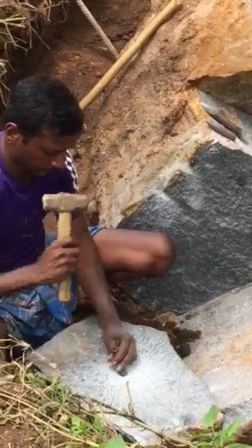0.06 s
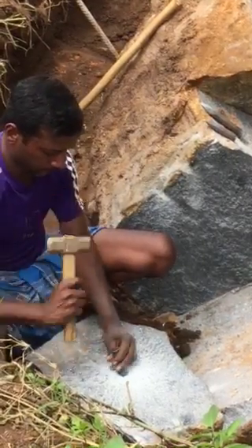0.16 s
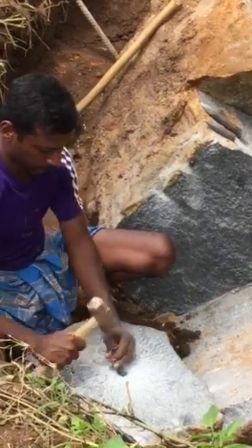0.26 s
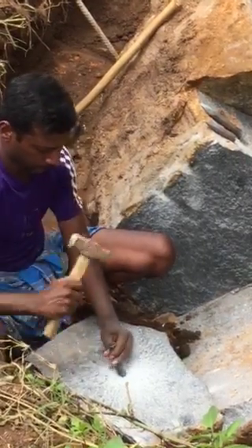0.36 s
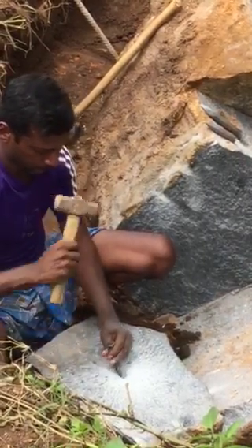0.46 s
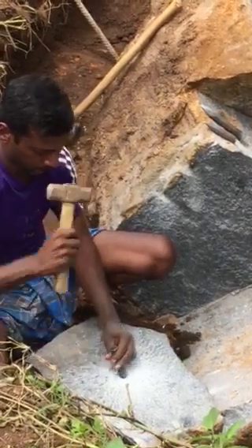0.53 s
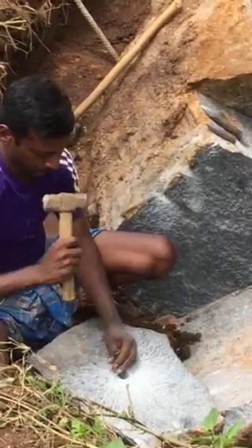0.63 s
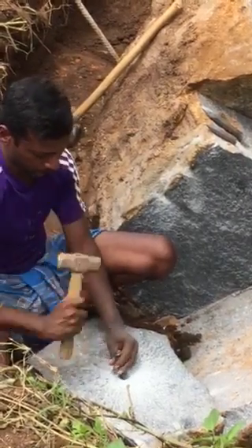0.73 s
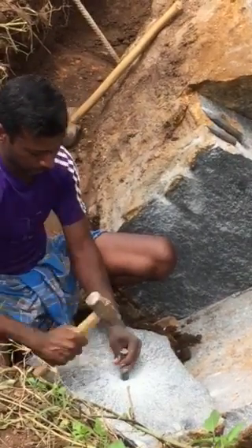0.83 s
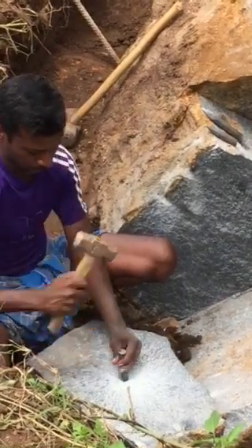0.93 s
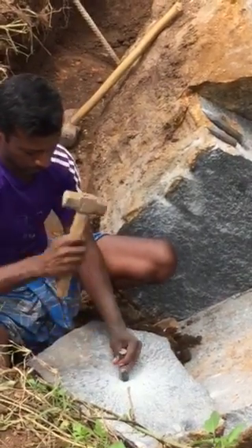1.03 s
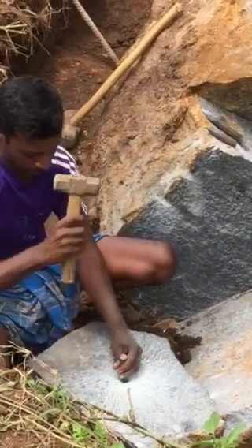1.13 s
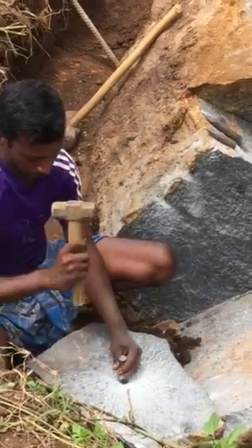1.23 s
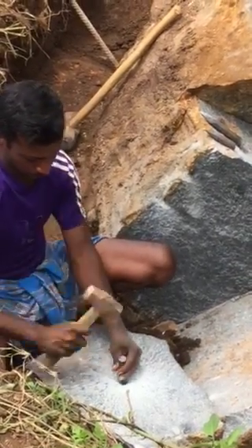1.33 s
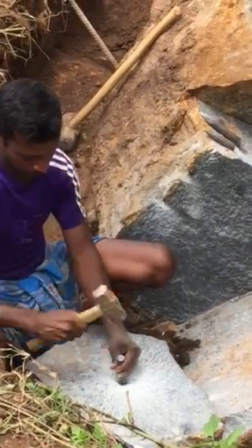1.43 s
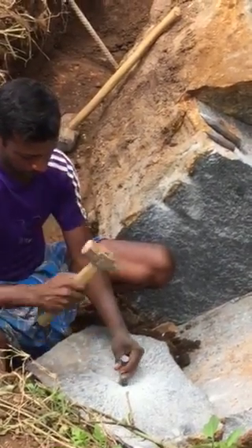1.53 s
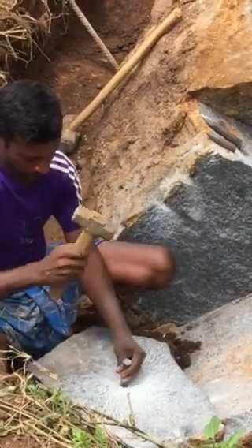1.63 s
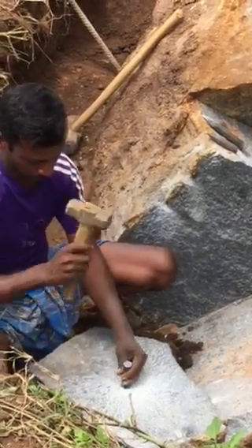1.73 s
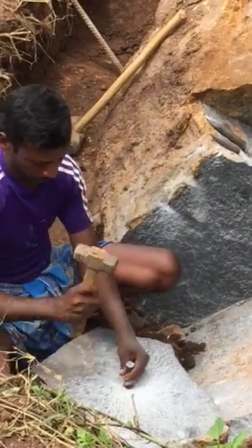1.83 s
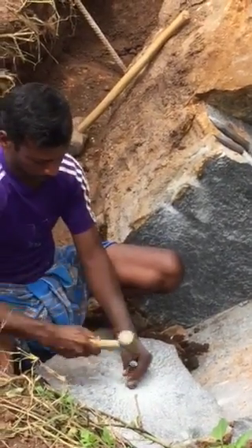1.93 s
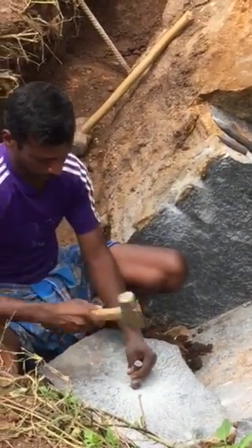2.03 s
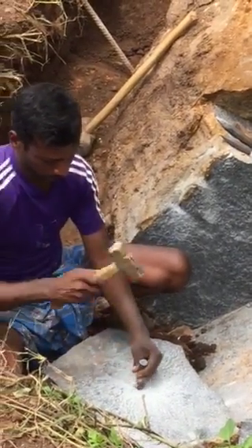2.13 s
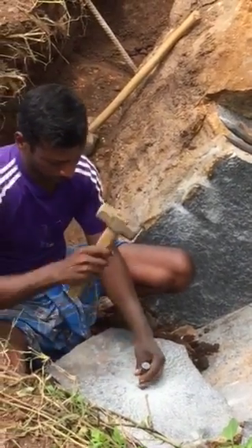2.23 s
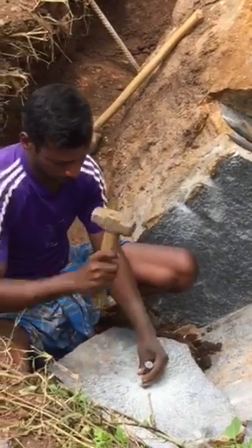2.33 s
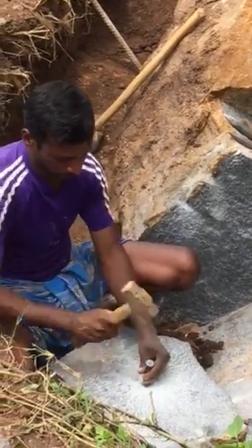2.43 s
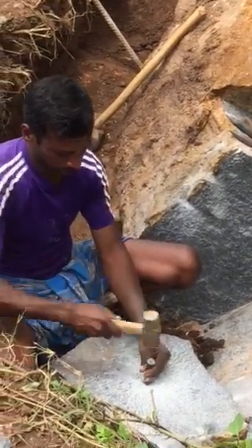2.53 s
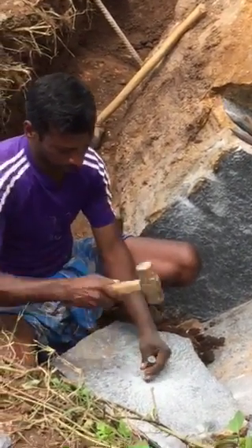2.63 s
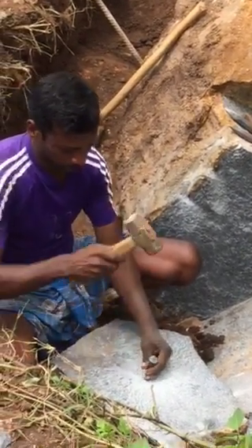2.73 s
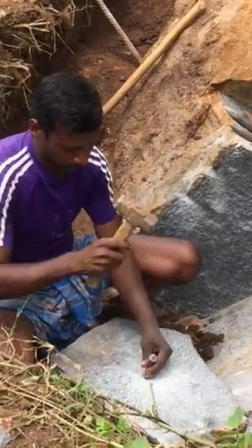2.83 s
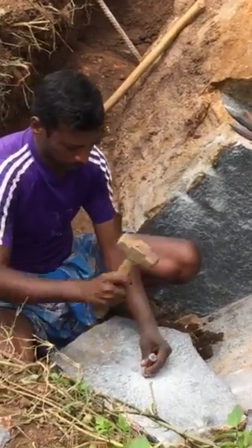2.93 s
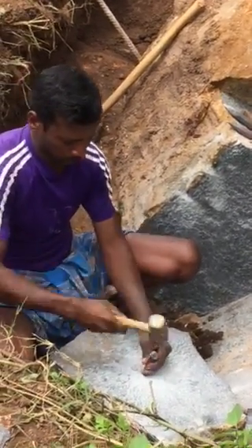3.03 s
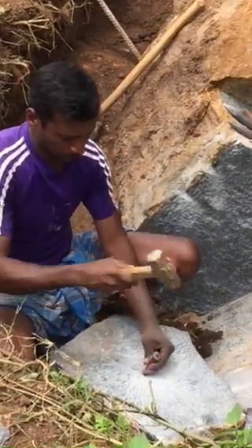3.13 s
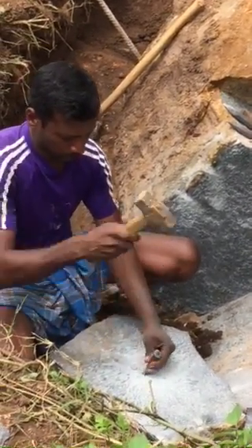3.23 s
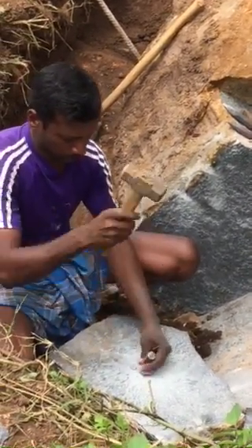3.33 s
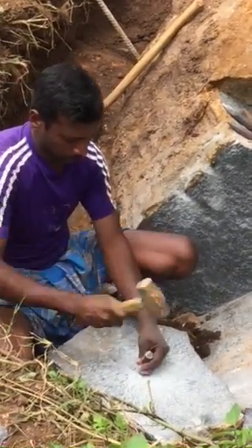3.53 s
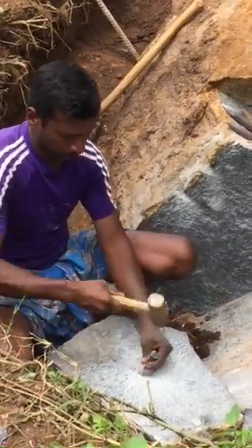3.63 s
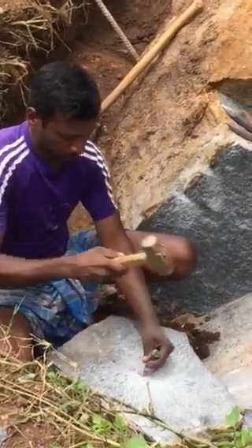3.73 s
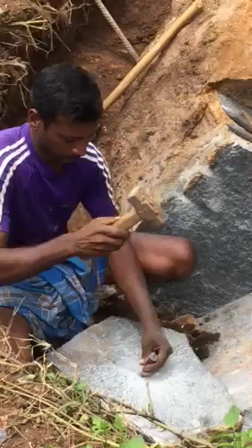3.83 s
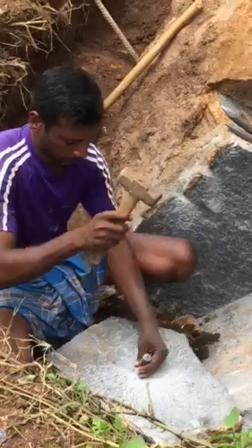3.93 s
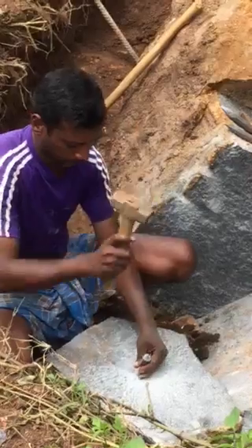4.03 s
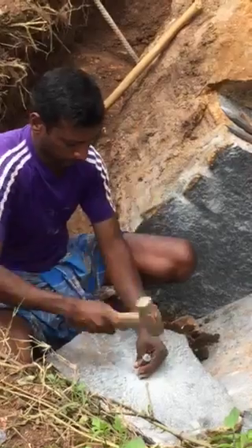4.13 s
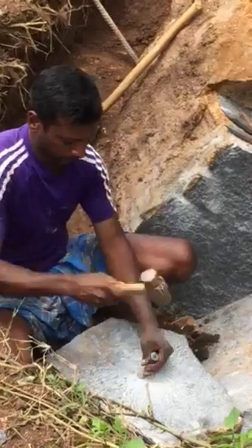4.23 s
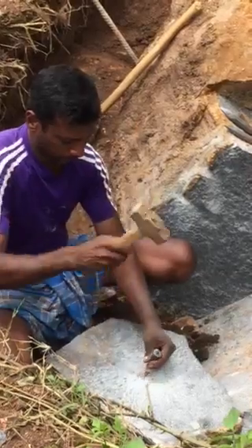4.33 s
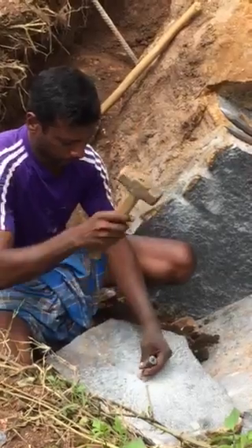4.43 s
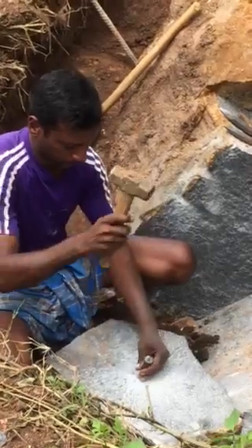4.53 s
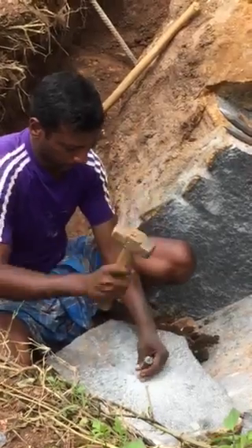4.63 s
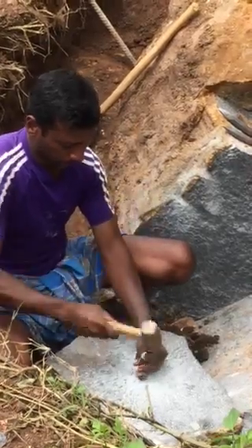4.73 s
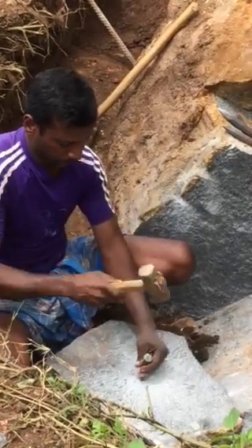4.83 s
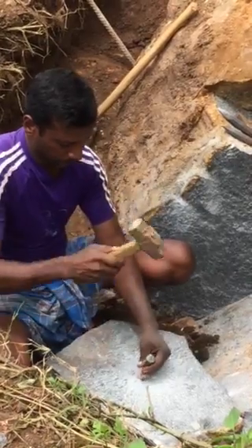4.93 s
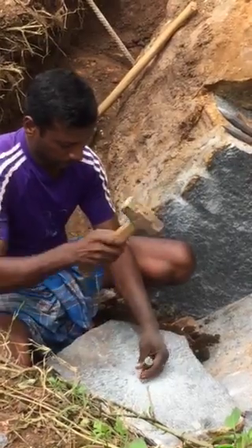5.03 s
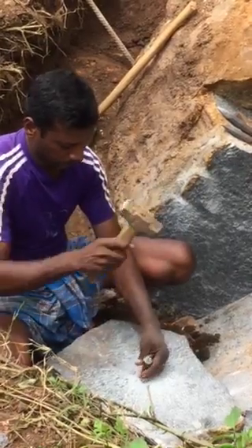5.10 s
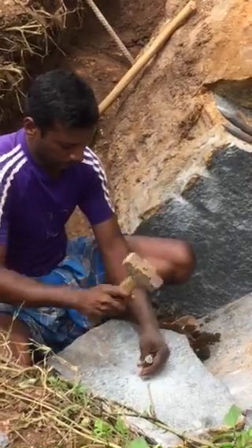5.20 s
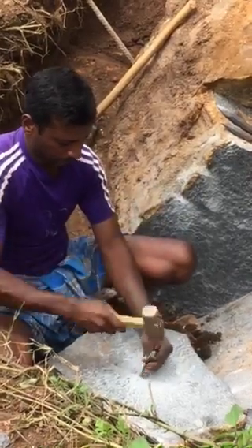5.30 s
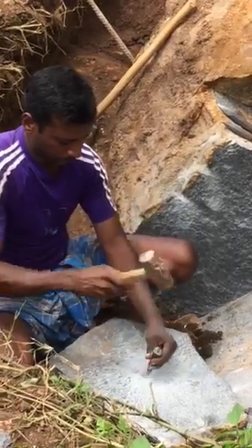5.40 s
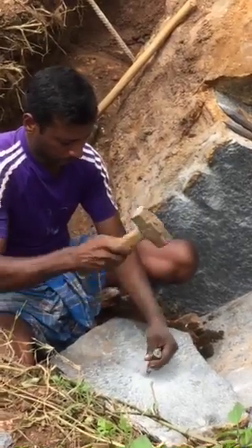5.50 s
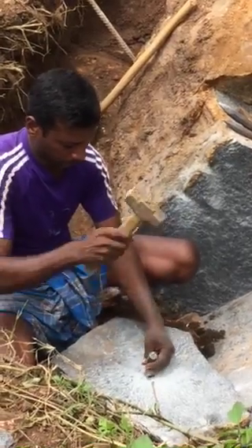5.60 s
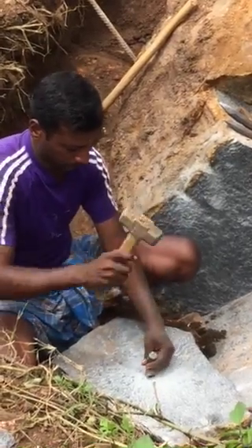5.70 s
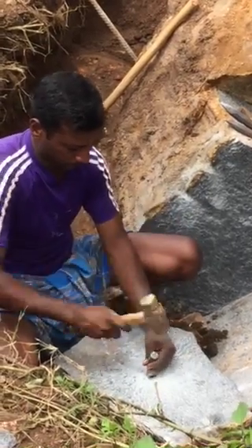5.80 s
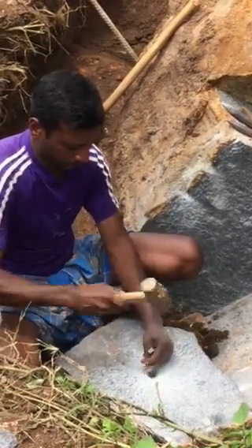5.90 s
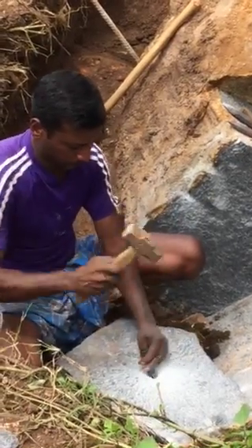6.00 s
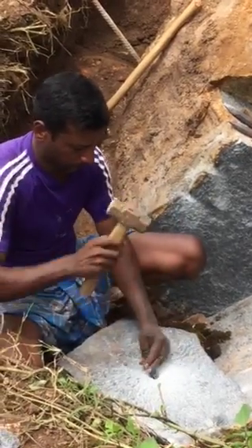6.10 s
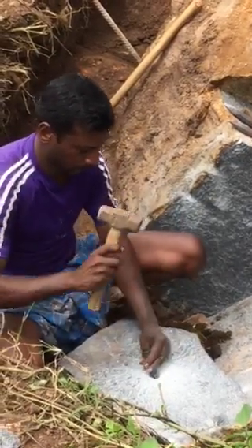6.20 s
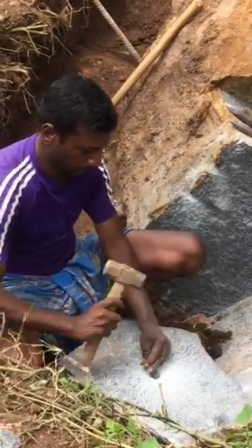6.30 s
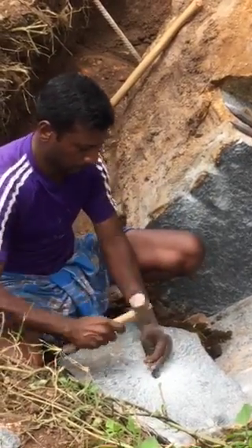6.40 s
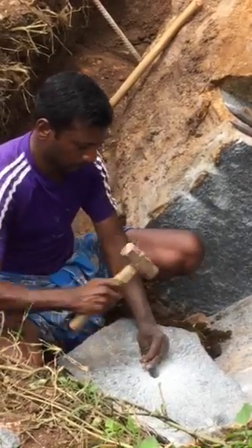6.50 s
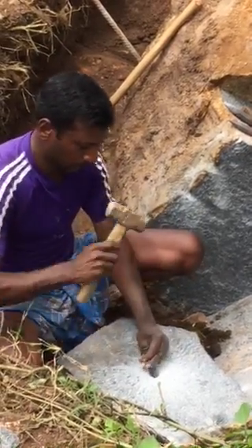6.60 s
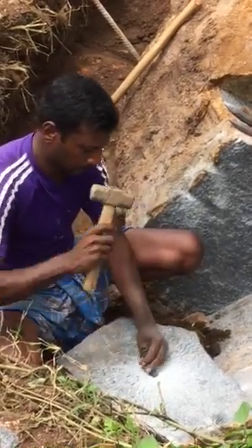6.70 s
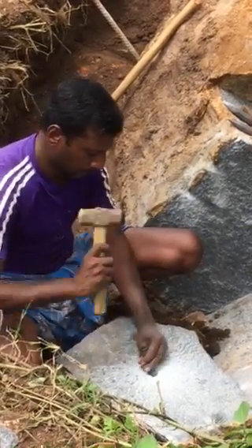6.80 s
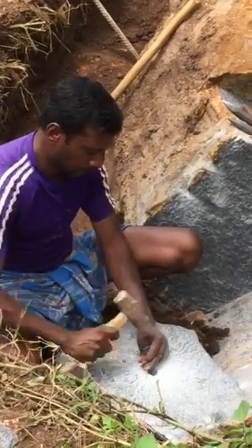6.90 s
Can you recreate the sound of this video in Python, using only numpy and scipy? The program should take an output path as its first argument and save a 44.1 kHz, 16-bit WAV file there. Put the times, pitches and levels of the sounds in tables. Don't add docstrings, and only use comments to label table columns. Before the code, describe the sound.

A hand hammer strikes a steel chisel on a stone slab, sharp gritty clinks about two a second, outdoors with insects.

```python
import sys
import numpy as np
from scipy import signal
from scipy.fft import rfft, irfft
from scipy.io import wavfile
from scipy.ndimage import uniform_filter1d

SR = 44100
rng = np.random.default_rng(int(sys.argv[2]) if len(sys.argv) > 2 else 0)


def wav_out(sig):
    wavfile.write(sys.argv[1], SR, np.round(np.clip(np.atleast_2d(sig).T, -1, 1) * 32767).astype(np.int16))


def natural_amplitude(level_db):
    exponent = np.asarray(level_db, float) / 20
    return 10 ** exponent


N = 306495


def rms_one(x):
    return x / np.sqrt(np.mean(x ** 2) + 1e-20)


def band(x, low_hz, high_hz, order=2):
    sos = signal.butter(order, [low_hz, min(high_hz, .45 * SR)], "band", fs=SR, output="sos")
    return signal.sosfilt(sos, x)


def noise_band(low_hz, high_hz, order=2):
    return band(rng.standard_normal(N), low_hz, high_hz, order)


def coloured(spectrum, size=N):
    hz, db = np.transpose(spectrum)
    grid_hz = np.maximum(np.fft.rfftfreq(size, 1 / SR), 1)
    gain = natural_amplitude(np.interp(np.log(grid_hz), np.log(hz), db))
    return rms_one(irfft(rfft(rng.standard_normal(size)) * gain, size))


def drift(rate_hz):
    knots = rng.standard_normal(int(N / SR * 100))
    r = np.exp(-2 * np.pi * rate_hz / 100)
    slow = rms_one(signal.lfilter([1], [1, -r], knots))
    return np.interp(np.arange(N) / SR * 100, np.arange(len(knots)), slow)


def ring(x, hz, t60_s):
    r, w = natural_amplitude(-60 / (t60_s * SR)), 2 * np.pi * hz / SR
    return signal.lfilter([0, np.sin(w)], [1, -2 * r * np.cos(w), r * r], x + 1e-18)


def resonances(peaks):
    white = rng.standard_normal(N)
    out = np.zeros(N)
    for hz, width_hz, db in peaks:
        tone = rms_one(band(white, hz - width_hz / 2, hz + width_hz / 2, order=3))
        out += natural_amplitude(db + 2.5 * drift(3)) * tone
    return out


def clicks(times_s, db):
    out = np.zeros(N)
    out[np.round(np.asarray(times_s) * SR).astype(int)] = natural_amplitude(db)
    return out


def dying(times_s, db, t60_s, hold_s=0):
    r = natural_amplitude(-60 / (t60_s * SR))
    start = clicks(times_s, db)
    release = np.roll(start, max(int(hold_s * SR), 1))
    return np.cumsum(start - release) + signal.lfilter([1], [1, -r], release + 1e-18)


def struck(modes, times_s, db, rattle_s):
    drive = rng.standard_normal(N) * dying(times_s, db, rattle_s) / np.sqrt(rattle_s * SR / 14)
    return sum(natural_amplitude(level_db) * ring(drive, hz, t60_s) for hz, level_db, t60_s in modes)


# (time [s], level [dB])
GUSTS = [(0.0, -69.5), (0.21, -60), (3.44, -64.5), (3.58, -55), (3.85, -77), (4.06, -65), (4.26, -58),
         (4.47, -74.5), (4.72, -70.5), (4.9, -64.5), (5.46, -65.5), (6.02, -60), (6.46, -67.5), (6.95, -56)]
# (frequency [Hz], density [dB per Hz])
WIND_SPECTRUM = [(12, -73), (25, -20), (40, -3), (60, 4.5), (90, 2.5), (140, -6.5), (220, -17), (400, -40),
                 (1000, -86)]


def wind():
    gust_db = np.interp(np.arange(N) / SR, *np.transpose(GUSTS))
    return natural_amplitude(gust_db + 3.5 + 2.3 * drift(6)) * coloured(WIND_SPECTRUM)


# (frequency [Hz], density [dB per Hz])
HUM_SPECTRUM = [(150, -0.5), (300, -1), (600, -3.5), (1200, -0.5), (2200, -5.5), (3500, -10), (5500, -16),
                (8000, -21), (11000, -26.5), (13500, -20.5), (16000, -18.5)]
# (centre [Hz], width [Hz], level [dB])
HUM_PEAKS = [(590, 150, -18.5), (1230, 200, -21), (1970, 130, -16)]


def countryside_hum():
    level = natural_amplitude(-61.5 + 0.37 * drift(2.8))
    return level * (coloured(HUM_SPECTRUM) + natural_amplitude(drift(3.8)) * resonances(HUM_PEAKS))


# (centre [Hz], width [Hz], level [dB])
CHORUS = [(6300, 260, 0), (6470, 200, -3), (6160, 160, -6), (11800, 500, -15)]
# (centre [Hz], width [Hz], level [dB])
CALLER = [(6070, 70, 0), (5810, 120, -10), (5950, 200, -11)]


def insects():
    t = np.arange(N) / SR
    period_s, swell_peak_s = 1.139, 0.6
    chorus_db = -66.5 + 1.5 * np.cos(2 * np.pi * (t - swell_peak_s) / period_s)
    buzz = 1 + 0.2 * np.sin(2 * np.pi * 98 * t + 1.1 * drift(3))
    calls = dying(.5 + period_s * np.arange(6), -68.5, .4, hold_s=.42)
    chorus = natural_amplitude(chorus_db + 0.97 * drift(7.8)) * rms_one(resonances(CHORUS))
    return buzz * (chorus + calls * rms_one(resonances(CALLER)))


# (time [s], length [s], start [Hz], end [Hz], level [dB])
BIRDS = [(0.1, 0.03, 1207, 1250, -59), (0.21, 0.046, 1295, 1240, -64.5), (0.892, 0.032, 1280, 1290, -61),
         (2.2, 0.04, 1190, 1220, -65), (2.284, 0.1, 1250, 1430, -62), (2.424, 0.17, 590, 590, -66.5),
         (5.815, 0.028, 1240, 1198, -63), (0.763, 0.082, 1233, 1246, -61.5), (1.255, 0.1, 2016, 1983, -56),
         (1.27, 0.046, 1810, 1780, -61), (1.34, 0.044, 2130, 2180, -59), (1.456, 0.044, 1257, 1280, -56.5),
         (2.859, 0.055, 1340, 1230, -55.5), (2.982, 0.048, 1280, 1230, -60),
         (3.562, 0.084, 1184, 1333, -59.5), (3.564, 0.025, 1710, 1930, -59),
         (4.407, 0.026, 1970, 1960, -63), (4.456, 0.023, 3020, 2830, -59),
         (4.618, 0.061, 2980, 2800, -55.5), (4.687, .035, 4000, 3500, -67),
         (4.727, 0.034, 2550, 2350, -60.5), (4.745, 0.045, 2010, 2020, -59),
         (5.178, 0.031, 1272, 1296, -60)]


def birds():
    out = np.zeros(N)
    flutter = 1 + .45 * rms_one(noise_band(20, 140))
    for s, length_s, start_hz, end_hz, db in BIRDS:
        n, at = int(length_s * SR), int(s * SR)
        phase = 2 * np.pi * np.cumsum(np.linspace(start_hz, end_hz, n)) / SR
        out[at:at + n] += natural_amplitude(db) * np.hanning(n) ** .35 * np.sin(phase)
    return out * flutter


# (time [s], level [dB], low [Hz], high [Hz], t60 [s])
KNOCKS = [
    (3.492, -42, 130, 330, .12),
    (3.49, -50, 500, 1100, .15),
    (3.5, -47, 50, 120, .2),
    (3.547, -47, 500, 1000, .25),
    (4.92, -59, 1800, 2020, .7),
    (4.955, -53, 480, 800, .8),
    (5.03, -57, 500, 1300, .15),
    (6.19, -45, 40, 90, .25),
]


def far_knocks():
    out = np.zeros(N)
    for s, db, low_hz, high_hz, t60_s in KNOCKS:
        envelope = uniform_filter1d(dying([s], db, t60_s, hold_s=0.012), size=350)
        out += rms_one(noise_band(low_hz, high_hz)) * envelope
    return out


# (time [s], level [dB], centre [Hz])
TAPS = [(0.132, -65, 3000), (.48, -45, 2100), (2.891, -72, 7500), (0.68, -54, 2500), (4.02, -58, 2500),
        (4.571, -74, 6000), (4.585, -43, 1960), (5.1191, -38, 2630), (5.675, -47, 2500), (5.69, -49, 2500),
        (5.701, -40, 2700), (5.7049, -42, 2680)]


def taps():
    out = np.zeros(N)
    for s, db, hz in TAPS:
        envelope = dying([s], db + 10, 0.013) + dying([s], db - 2, 0.091)
        out += band(rng.standard_normal(N) * envelope, hz / 2, hz * 1.48, order=3)
    return out


# (time [s], length [s], lower ring [dB], upper ring [dB])
SCRAPES = [(0.001, 0.066, -65, -88), (0.077, 0.035, -72, -75), (0.119, 0.02, -55.5, -64),
           (0.134, 0.012, -56, -62), (0.676, 0.031, -60, -66), (0.707, .02, -64, -65),
           (1.149, 0.029, -64.5, -73.5), (1.228, 0.034, -82, -84), (1.732, 0.048, -74.5, -72),
           (2.224, 0.063, -64, -87.5), (2.293, 0.015, -75, -77), (2.336, 0.016, -84, -73),
           (3.42, 0.037, -80, -69), (3.893, 0.054, -90, -75.5), (4.006, 0.0075, -54, -66),
           (4.024, 0.01, -79, -65), (4.569, 0.0033, -47, -47), (4.574, 0.016, -65, -54),
           (4.656, 0.024, -78, -81.5), (5.053, 0.049, -67, -81), (5.105, 0.011, -67, -50),
           (5.111, 0.013, -51, -61), (5.668, 0.018, -64, -59), (5.69, 0.018, -64, -52),
           (5.814, 0.013, -80, -73), (6.658, 0.027, -65, -79), (6.74, 0.03, -70, -68)]


def scrapes():
    out = np.zeros(N)
    for column, (hz, _, _) in zip((2, 3), CHISEL):
        drag = np.zeros(N)
        for row in SCRAPES:
            steadiness = np.sqrt(min(row[1], .006) * SR / 4)
            drag += dying([row[0]], row[column], 0.0035, hold_s=row[1]) / steadiness
        friction = drag * rng.standard_normal(N) * natural_amplitude(1.1 * drift(40))
        out += band(ring(friction, hz, 0.041), 9600, 13500)
    return out


# (time after the blow [s], level [dB])
ECHO_SHAPE = [(0, -80), (0.01, -50.5), (0.028, -48.5), (.045, -56.5), (.075, -55), (.13, -65), (.2, -80),
              (.3, -77.5), (.4, -110)]
ECHO_BANDS_DB = [-18, -9, -11.5, -9.5, -8, -6, -3, -2, -6.5, -7.5]


def banks(ringing):
    lag_s, db = np.transpose(ECHO_SHAPE)
    size = int(.4 * SR)
    shape = natural_amplitude(np.interp(np.arange(size) / SR, lag_s, db))
    out = natural_amplitude(-14.5) * signal.fftconvolve(ringing, shape * rng.standard_normal(size))[:N]
    for (low_hz, high_hz, _), level_db, echo_db in zip(CRACK_BANDS, band_levels(), ECHO_BANDS_DB):
        strength = clicks(TIMES_S, echo_db + 1.1 * (level_db - np.mean(level_db)))
        out += signal.fftconvolve(strength, shape)[:N] * rms_one(noise_band(low_hz, high_hz))
    return out


TIMES_S = [.4079, .9565, 1.5219, 2.0727, 2.6272, 3.1728, 3.7227, 4.2958, 4.858, 5.4064, 5.965, 6.4956]
# (ground thump [dB], weight on slab [dB], crushed grit [dB], snap of face [dB])
STONE = [(-29, -14.5, -22, 3), (-36.5, -14, -20, 1), (-34.5, -15, -14, -1.5), (-42.5, -20.5, -16, -8),
         (-50, -25.5, -14.5, -7), (-35, -14, -20.5, 1.5), (-19, -18.5, -16.5, 1), (-9.5, -13.5, -18, 2),
         (-10.5, -13.5, -18, 1), (-31.5, -17, -16, 1), (-9.5, -16, -21, 1), (-38.5, -14.5, -16, 0)]


def thump():
    push = clicks(np.array(TIMES_S) + 0.0019, np.transpose(STONE)[0] + 6)
    return natural_amplitude(7.5) * ring(push, 130, 0.0091) - ring(np.roll(push, 60), 56, 0.057)


MEAN_WEIGHT_DB, MEAN_GRIT_DB = -17, -18
# (frequency [Hz], level [dB], t60 [s])
SLAB = [(1950, 0, .02), (1860, -5, .015)]
# (frequency [Hz], level [dB], t60 [s])
CHIP_RING = [(4450, 0, .004), (4150, -3, .004), (8800, -6, .003)]


def slab():
    thump_db, _, grit_db, _ = np.transpose(STONE)
    hum = struck(SLAB, TIMES_S, -30 + 0.44 * thump_db, 0.57)
    chips = struck(CHIP_RING, TIMES_S, -30 + 1.3 * (grit_db - MEAN_GRIT_DB), .3)
    tok = struck([(642.5, 0.0087, 0.065)], TIMES_S, -27.5, .04)
    return hum + chips + tok


# (chisel ring [dB], looseness of grip [dB], hammer head ring [dB], top ring [dB])
STEEL = [(-17.5, -3.5, -13.5, -16.5), (-13, -4.5, -13.5, -12), (-30, 3, -19, -20), (-28, -0.5, -18, -13.5),
         (-26, 0, -12, -12), (-11, -7, -21, -19.5), (-15, 3.5, -16.5, -8.5), (-13, -10.5, -19, -18.5),
         (-13.5, -0.5, -19.5, -17), (-16.5, -3.5, -22.5, -11.5), (-15.5, -5, -25.5, -22.5),
         (-20, -0.5, -14.5, -24.5)]
# (frequency [Hz], level [dB], t60 [s])
CHISEL = [(10410, 0, .045), (10855, -1, .028), (11125, -7, .035)]
HEAD = [(11765, 0, .025), (12300, -8, .02), (9280, -10, .02)]
TOP = [(14700, 0, .016), (13450, -11, .012), (15200, -7, .008)]
# (frequency [Hz], level [dB], t60 [s])
FREE_RING = [(10450, -26.5, 0.32), (10850, -38.5, .3)]


def steel():
    ring_db, loose_db, head_db, top_db = np.transpose(STEEL)
    tilt_db = 0.39 * loose_db
    lower = struck(CHISEL[:1], TIMES_S, ring_db - 0.64 + tilt_db, 0.021)
    upper = struck(CHISEL[1:], TIMES_S, ring_db + 4.5 - tilt_db, 0.066)
    free = sum(ring(clicks(TIMES_S, ring_db + loose_db + db), hz, t60_s) for hz, db, t60_s in FREE_RING)
    head = struck(HEAD, TIMES_S, head_db, 0.033)
    top = struck(TOP, TIMES_S, top_db + 0.5, 0.078)
    return lower + upper + free + head + top


def band_levels():
    thump_db, weight_db, grit_db, snap_db = np.transpose(STONE)
    _, _, head_db, top_db = np.transpose(STEEL)
    weight, grit = weight_db - MEAN_WEIGHT_DB, grit_db - MEAN_GRIT_DB
    knock_db = 20 * np.log10(natural_amplitude(-26.5 + .6 * weight) + natural_amplitude(thump_db - 12))
    face_db = -18.5 + snap_db
    edge_db = -22.5 + 0.5 * snap_db
    chips_db = -19.5 + 1.5 * grit
    fine_grit_db = -16.5 + 1.1 * grit
    dust_db = -18.5 + 0.76 * grit
    splinter_db = -14.5 + 0.76 * weight
    return [knock_db, weight_db, face_db, edge_db, chips_db, fine_grit_db, dust_db, splinter_db,
            head_db - 3, top_db - 3]


def evened(noise, burst):
    blow = np.searchsorted(np.array(TIMES_S[1:]) * SR - 1, np.arange(N))
    wanted = np.bincount(blow, burst ** 2)
    actual = np.bincount(blow, (noise * burst) ** 2)
    return noise * burst * np.sqrt(wanted / actual)[blow]


# (low [Hz], high [Hz], t60 [s])
CRACK_BANDS = [(171, 360, 0.057), (486, 1046, 0.032), (1250, 2200, 0.039), (1680, 2500, 0.036),
               (2500, 3500, 0.041), (3670, 4800, 0.054), (5050, 6800, .06), (6830, 10760, 0.056),
               (9500, 13000, 0.022), (13930, 15800, 0.066)]


def crack():
    out = np.zeros(N)
    for (low_hz, high_hz, t60_s), db in zip(CRACK_BANDS, band_levels()):
        chatter = natural_amplitude(2.9 * rms_one(noise_band(80, 240)))
        burst = dying(TIMES_S, db - 5.5, t60_s, hold_s=0.0012) + dying(TIMES_S, db, 0.02)
        out += evened(noise_band(low_hz, high_hz) * chatter, burst)
    return out


def scene():
    air = wind() + countryside_hum() + insects()
    ringing, cracking = steel(), crack()
    sink_db = 5.7 * dying(TIMES_S, 0, 0.54, hold_s=0.13)
    ducked = natural_amplitude(-signal.lfilter([.002], [1, -.998], sink_db))
    blows = cracking + thump() + ringing + slab() + banks(ringing + natural_amplitude(-6) * cracking)
    return (blows + taps() + scrapes() + far_knocks() + birds() + ducked * air)[None]


def roll_off(x):
    return signal.sosfilt(signal.butter(12, 16800, fs=SR, output="sos"), x)


def record(dry):
    cutoff_hz, block = 15950, 512
    x = signal.sosfilt(signal.cheby2(22, 50, cutoff_hz, fs=SR, output="sos"), dry[0])
    x = .82 * np.tanh(x / .82)
    x = signal.sosfilt(signal.cheby2(22, 60, cutoff_hz + 800, fs=SR, output="sos"), x)
    x = signal.sosfilt(signal.butter(4, 36, "high", fs=SR, output="sos"), x)
    early = natural_amplitude(-41.5) * np.roll(x, -2 * block) + natural_amplitude(-51.0) * np.roll(x, -block)
    fading = rng.standard_normal(2 * block) * natural_amplitude(-54 - 4.2 * np.linspace(0, 1, 2 * block))
    backwards = band(x, 60, 2300, order=4)[::-1]
    smear = signal.fftconvolve(backwards, fading)[:N][::-1]
    return roll_off((x + early + smear)[None])


dry = scene()
out = record(dry)
wav_out(out)
```